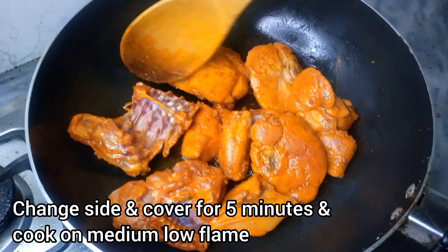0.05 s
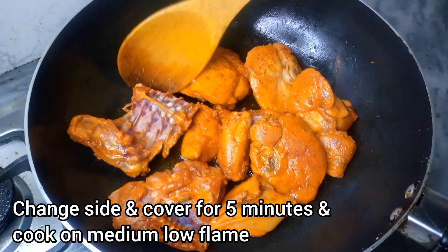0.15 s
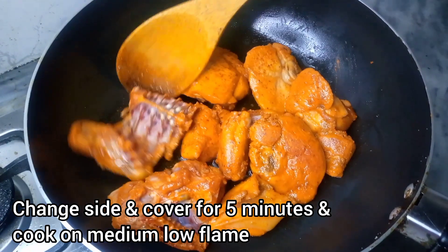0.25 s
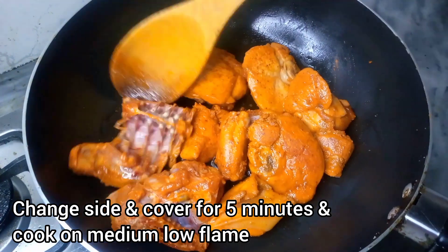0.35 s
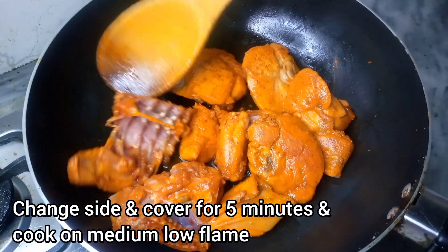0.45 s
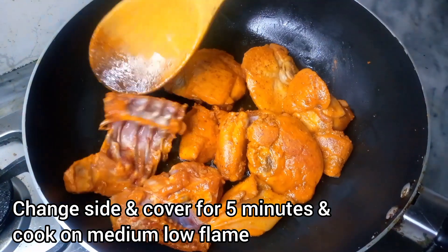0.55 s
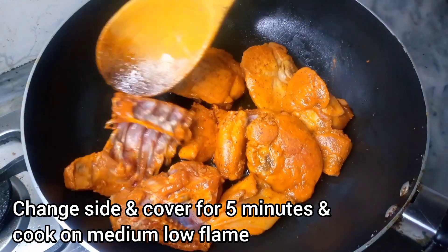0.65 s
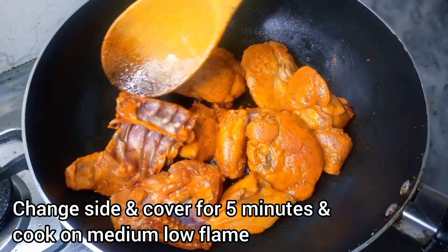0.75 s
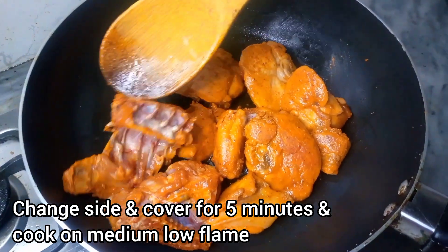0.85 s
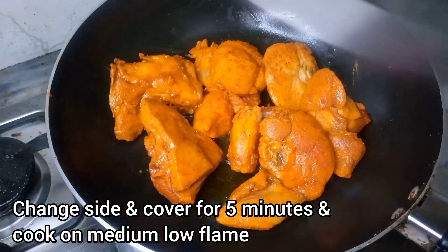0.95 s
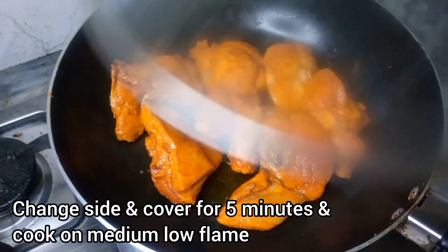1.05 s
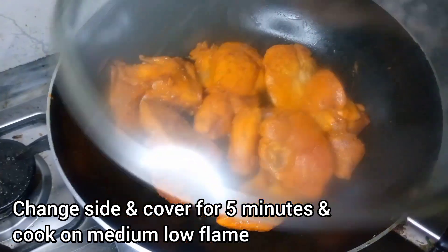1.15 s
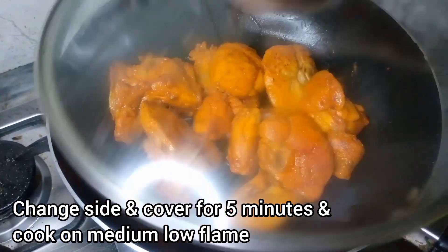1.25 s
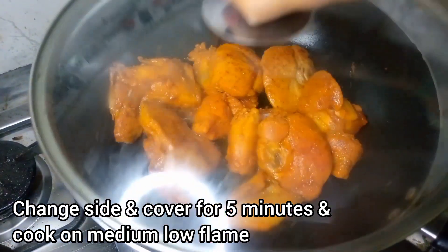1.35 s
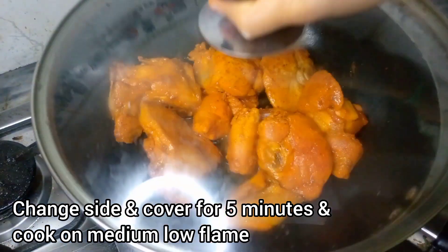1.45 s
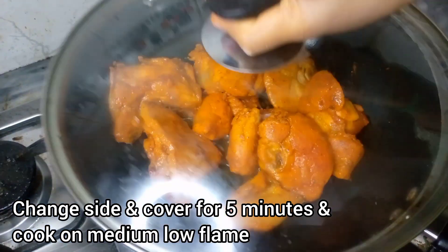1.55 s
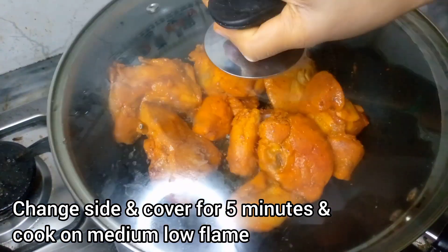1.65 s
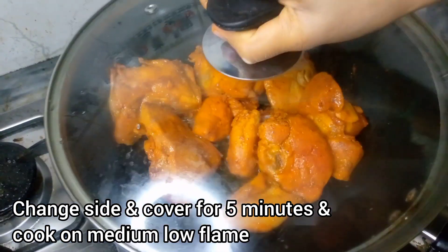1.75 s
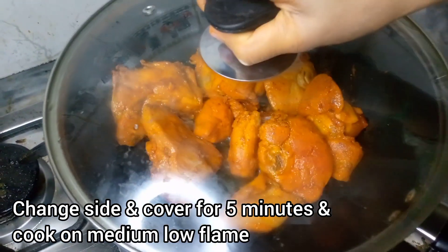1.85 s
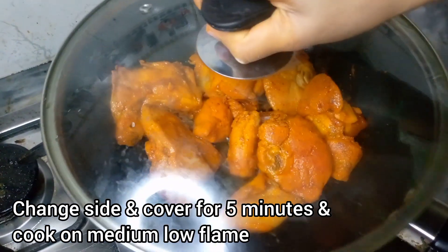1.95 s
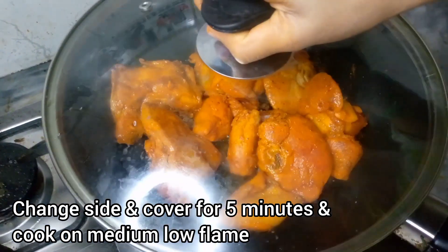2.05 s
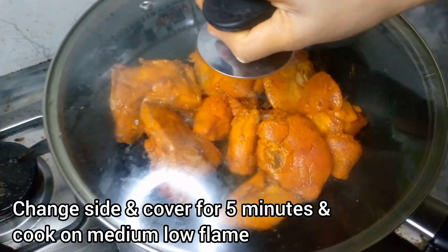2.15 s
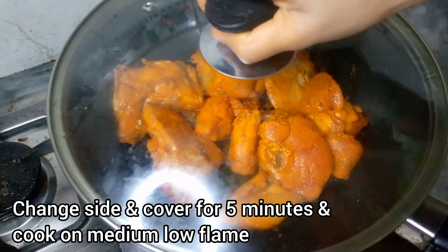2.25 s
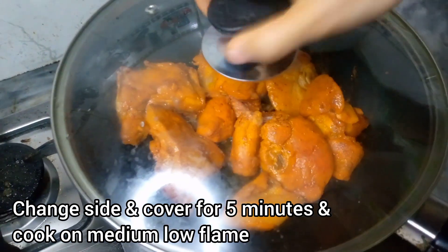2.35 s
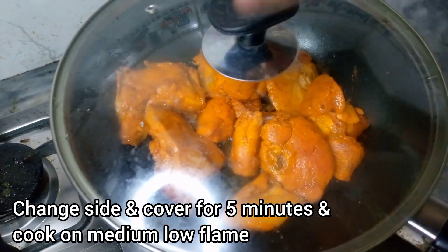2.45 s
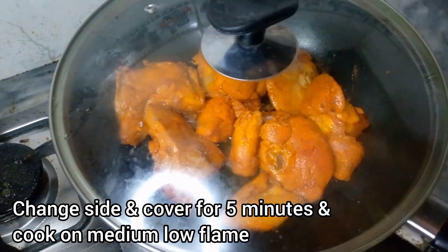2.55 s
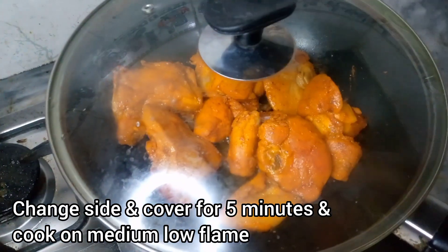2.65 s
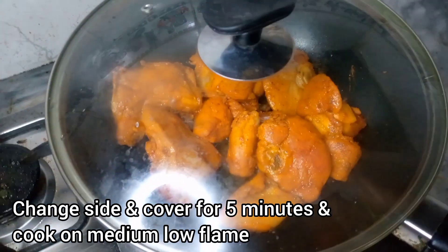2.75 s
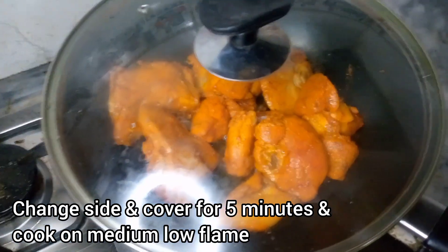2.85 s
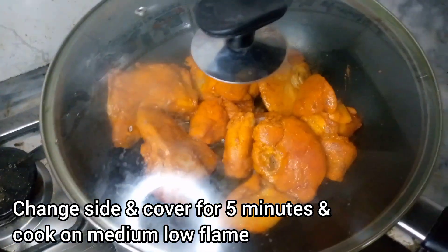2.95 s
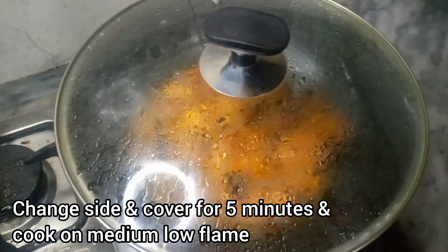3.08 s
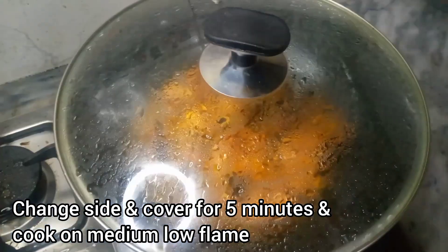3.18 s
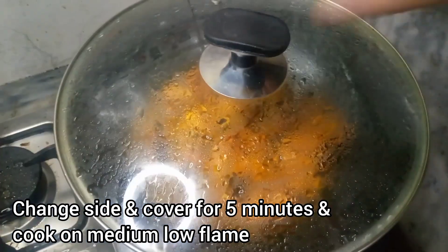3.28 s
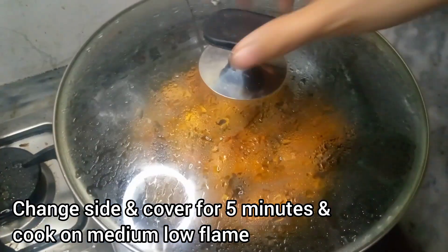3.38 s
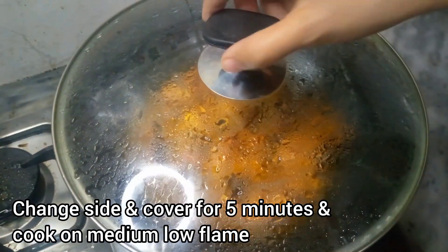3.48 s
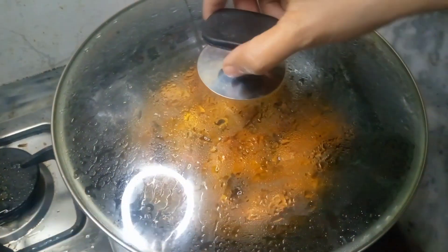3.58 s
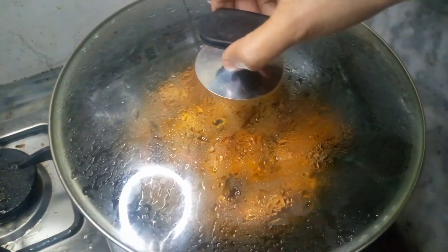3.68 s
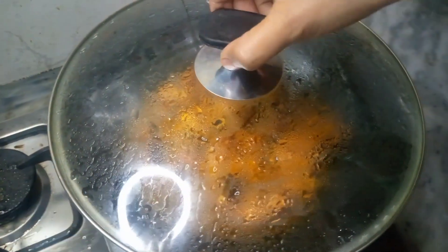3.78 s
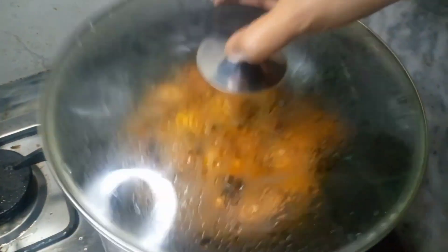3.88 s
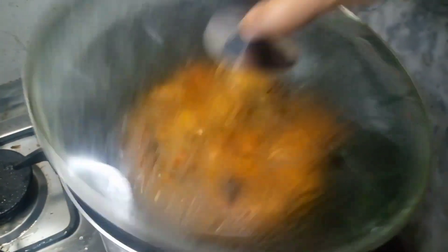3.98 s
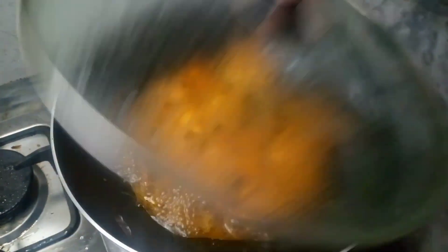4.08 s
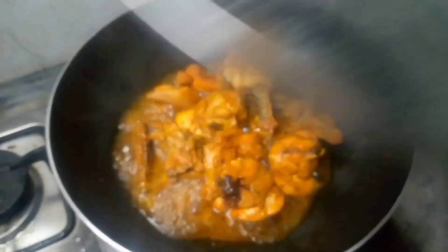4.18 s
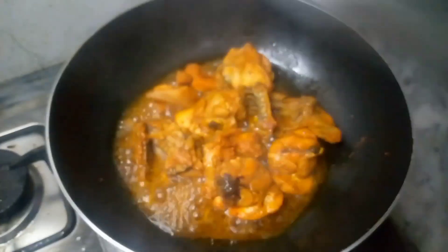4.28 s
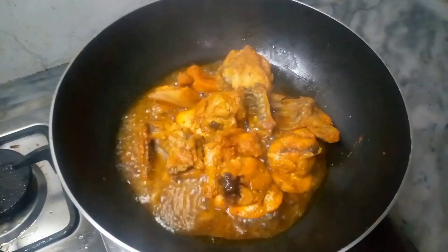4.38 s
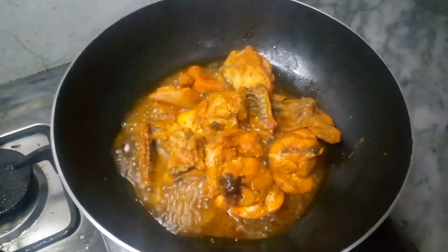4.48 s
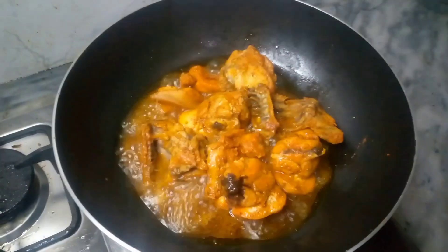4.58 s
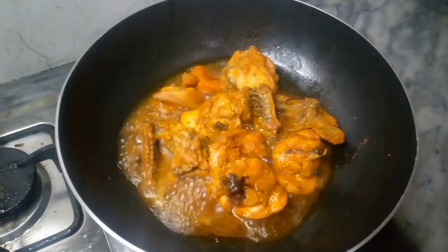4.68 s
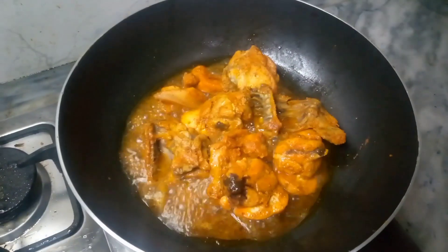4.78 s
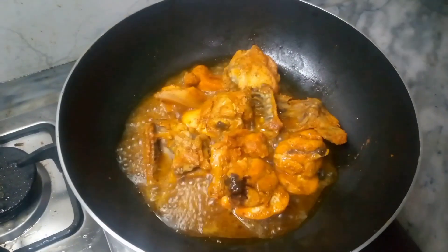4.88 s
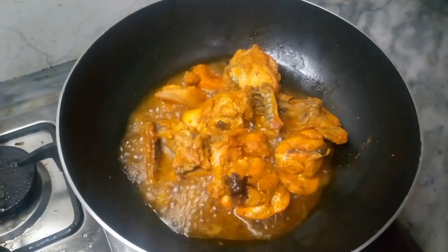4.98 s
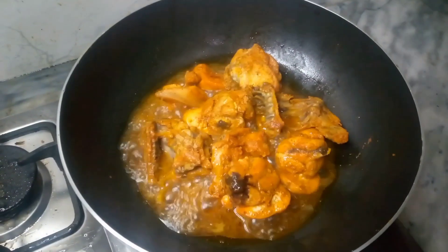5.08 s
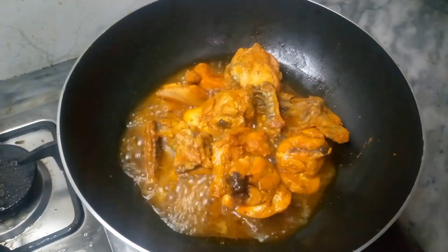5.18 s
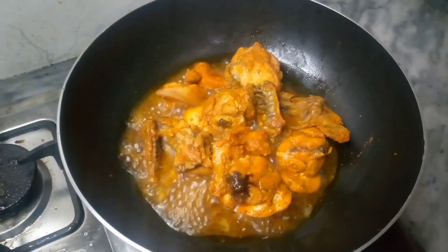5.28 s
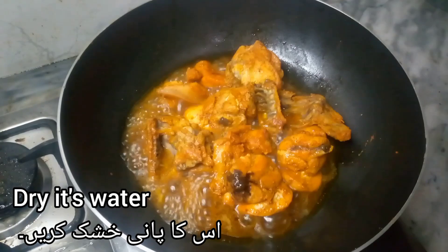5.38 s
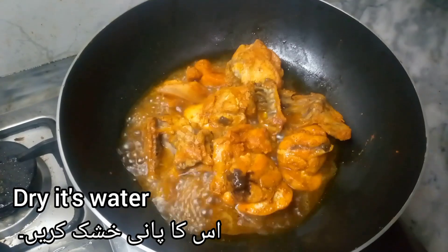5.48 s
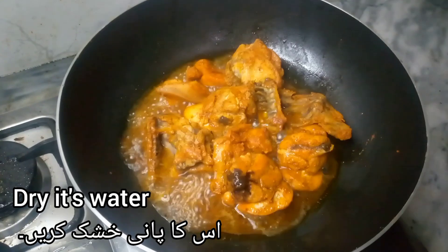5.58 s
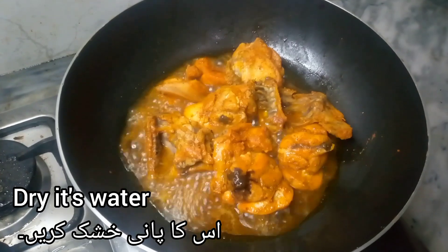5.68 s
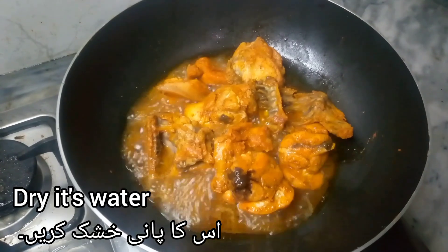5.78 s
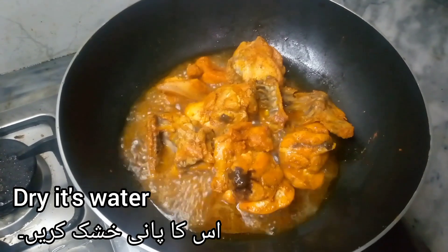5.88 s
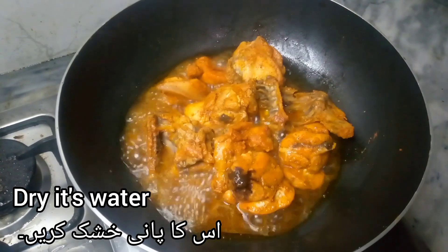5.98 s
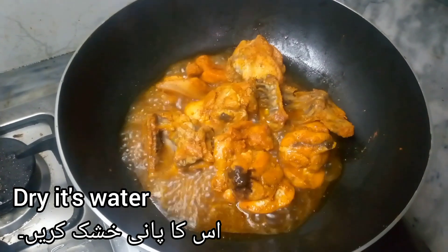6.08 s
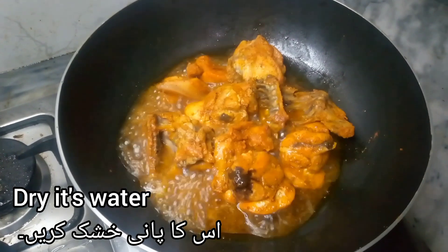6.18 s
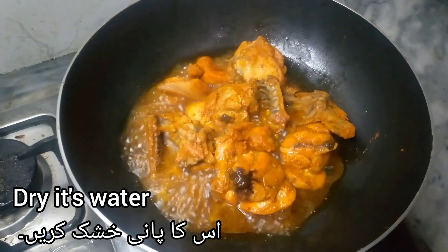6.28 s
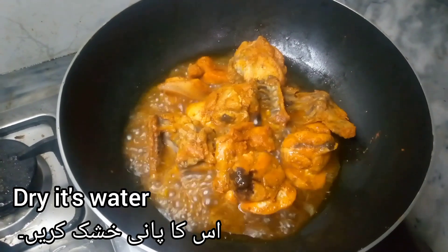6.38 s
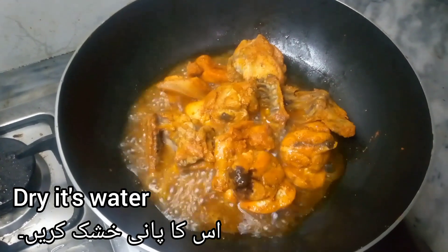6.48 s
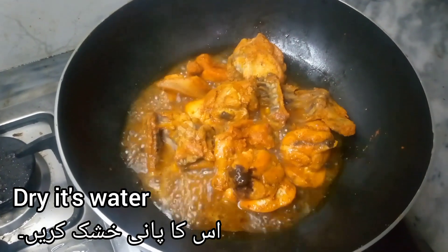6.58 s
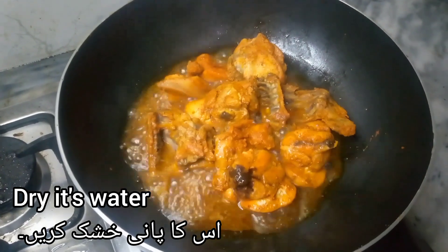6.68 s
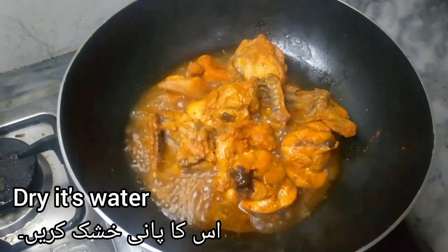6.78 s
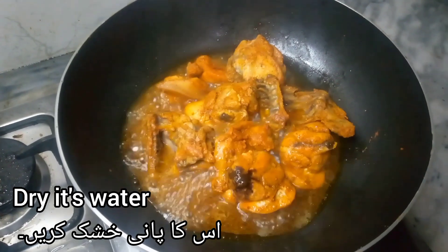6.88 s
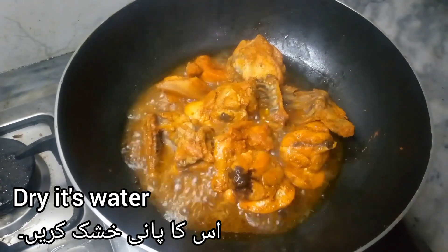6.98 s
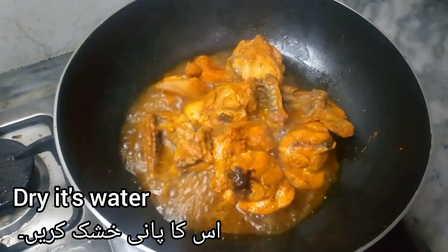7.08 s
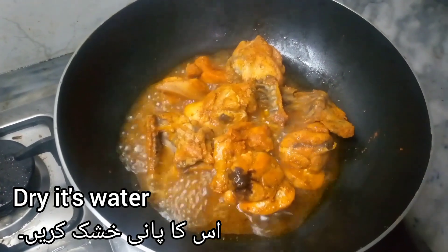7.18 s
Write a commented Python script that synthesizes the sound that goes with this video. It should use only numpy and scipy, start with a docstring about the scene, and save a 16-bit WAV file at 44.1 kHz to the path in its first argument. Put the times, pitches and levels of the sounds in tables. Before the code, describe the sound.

Close up in a small kitchen, meat pieces sizzle brightly in an open wok with spits of fat. A glass lid slides on, knocks the rim and scrapes shut, leaving the frying thinner and quieter. A tiny dry tick, a brief silence, then a faint covered simmer fades in. The lid lifts with a rising hollow whoosh and the sizzle opens up into strong wet bubbling with pops and spits, growing slightly to the end.

```python
"""Chicken fries in an open wok on a gas burner; a glass lid is lowered, knocks on the rim and is nudged shut.
After a short silence the meat simmers in its own juice under the lid, which is then lifted off the bubbling pan.
The sizzle is thousands of tiny random bursts a second, filtered by the air resonances of the wok and lid.
Bubbles, spits of fat and lid knocks are ringing tones with bursts of noise; a small kitchen answers them.
The flame and the rumble are slowly wavering low noise."""
import sys
import numpy as np
from scipy import signal
from scipy.fft import rfft, irfft, next_fast_len
from scipy.io import wavfile
from scipy.ndimage import map_coordinates

SR = 44100
rng = np.random.default_rng(int(sys.argv[2]) if len(sys.argv) > 2 else 0)


def wrap_up_sound(samples):
    """Save the sound to the file named by the first command line argument, as 16-bit audio."""
    columns = np.atleast_2d(samples).T
    # keep every value between -1 and 1, then stretch to whole-number steps
    tamed = np.clip(columns, -1, 1)
    steps = np.round(tamed * 32767).astype(np.int16)
    wavfile.write(sys.argv[1], SR, steps)


N = 318843  # length in samples

# Sizzle colour for each state of pan and lid. Each row: frequency in Hz, gain in dB.
FRY_OPEN = [(200, -24.5), (400, -30), (650, -38), (1250, -30), (2400, -8.5), (3850, 0), (5000, -1),
            (6400, 1), (9300, -7), (12000, -11.5), (15000, -18)]
FRY_AJAR = [(200, -15), (400, -25), (650, -25), (1250, -29), (2400, -3.5), (3850, -4), (5000, -1.5),
            (6400, -3.5), (9300, -12), (12000, -17.5), (15000, -22.5)]
FRY_SHUT = [(200, -13), (400, -10), (650, -16), (1250, -22.5), (2400, -8), (3850, -4.5), (5000, 3),
            (6400, 2), (9300, -4.5), (12000, -18), (15000, -39)]
STEW_SHUT = [(90, -38), (200, -1.5), (400, -12), (1300, -11), (2400, -2.5), (3850, -7), (5000, -3.5),
             (6200, 1), (9300, -8.5), (12000, -9.5), (15000, -19.5)]
STEW_OPEN = [(90, -38), (200, -23.5), (400, -35.5), (1300, -11.5), (2400, -2), (3850, -6), (5000, -4),
             (6200, -3), (9300, -11), (12000, -10), (15000, -19)]
# Air resonances of the pan in the same states. Each row: pitch in Hz, width in Hz, boost in dB.
FRY_OPEN_AIR = [(590, 69, 16), (781, 213, 23.5), (1243, 270, 18.5), (1695, 150, 9), (1960, 83, 8),
                (2465, 160, 2.5), (2740, 160, 0.5)]
FRY_AJAR_AIR = [(524, 76, 6), (807, 49, 10), (1043, 55, 7.4), (1484, 160, 13), (1797, 510, 7.6),
                (2380, 140, 5.3)]
FRY_SHUT_AIR = [(589, 66, 5.8), (826, 91, 16), (1280, 130, 10), (1474, 120, 15), (1720, 140, 14),
                (1934, 120, 17.6), (2434, 140, 8.5), (2935, 340, 6.1), (3520, 380, 8.3), (4380, 140, 4.9)]
STEW_SHUT_AIR = [(554, 86, 3.5), (815, 104, 17), (1008, 150, 14.5), (1320, 120, -7), (1525, 220, 3),
                 (1685, 54, 14.5), (1780, 110, 2), (3500, 200, 2), (3850, 320, -13), (4300, 200, 1.5),
                 (4720, 200, -5.5), (5820, 570, 3.5)]
STEW_OPEN_AIR = [(441.8, 16, 12.4), (485, 280, 22.9), (783, 320, 20.1), (968, 57, 7.8), (1278, 383, 14.7),
                 (1750, 210, 6.9), (2305, 64, 3.6)]
# The pan passes from each state to the next. Each row: middle of the passage in seconds, length in seconds.
CHANGES = [(1.133, 0.35), (1.84, 0.66), (3.08, .05), (4.106, 0.42)]
# Sizzle strength, one row for each state in the order above: bubbling in dB, fizz in dB.
STRENGTH = [(-53, -46.5), (-53, -51.5), (-62.5, -56), (-61, -57), (-47.5, -46.5)]
# The sizzle swells for a moment.
# Each row: start in seconds, length in seconds, most added bubbling in dB, most added fizz in dB.
SURGES = [(0.026, 0.51, 3.5, 3.5), (0.876, 0.17, 3.5, 3), (1.24, 0.35, 2.5, 4.5), (3.44, 0.22, 2, 3),
          (3.643, 0.23, 4.5, 1.5)]

# Colours of single sources. Each row: frequency in Hz, gain in dB.
FLAME_COLOUR = [(20, -26), (45, -11), (65, -1), (88, 4.5), (120, -3), (180, -19.5), (350, -31), (700, -53)]
RUB_COLOUR = [(50, -24), (100, -1.5), (170, -4), (310, -2), (400, -16.5), (520, -15.5), (700, -55),
              (1500, -63.5)]
CLANK_COLOUR = [(200, -33), (500, -6.5), (800, 4), (1000, 5), (1250, -3.5), (1600, -16), (3000, -42.5)]
CLACK_COLOUR = [(100, -21.5), (300, -15), (1000, 0), (1300, 5.5), (2500, 11), (5500, 12), (9500, -2),
                (15000, -19)]
CRACKLE_COLOUR = [(1000, -36.5), (2500, -2.5), (4300, 1), (6500, 3.5), (9500, -10), (15000, -19.5)]
SPLAT_COLOUR = [(300, -9), (800, -1.5), (1900, 0), (3000, -2), (4000, -1), (5500, -12), (9000, -27)]
# Microphone colour. Each row: frequency in Hz, gain in dB.
MIC_COLOUR = [(20, -24), (45, -4.5), (62, -1.5), (6400, -1.5), (7800, -6), (9300, 1), (11000, -5),
              (13600, -11.5), (14800, 7)]

# Lid knocks on the rim, and last a faint double crackle under the lid.
# Each row: time in seconds, then relative dB of low thud, middle clank and high clack.
KNOCKS = [(1.678, -28, -33, -27), (1.699, -20, -25.5, -28), (1.704, -23, -34, -27.5),
          (1.846, -42, -57, -38), (1.925, -52, -58, -45), (2.089, -27.5, -36.5, -42.5),
          (2.097, -29.5, -36, -43.5), (2.12, -32, -44, -64), (2.132, -32.5, -46, -64),
          (2.158, -38.5, -52, -66), (2.441, -56, -57, -39.5), (2.446, -60, -52, -47)]
# Pitches in Hz at which thud, clank and clack each set the strength of the ring.
BLOW_HZ = (330, 940, 2600)
# Lid and wok ring together. Each row: pitch in Hz, relative dB, seconds to fall by 60 dB.
LID_MODES = [(85.8, -10, 0.24), (135, -15, 0.22), (240, -14, .045), (325.6, -9, 0.14), (470.5, -12.5, 0.19),
             (545, -17.5, 0.29), (800, -23, 0.1), (941.5, -9.5, 0.28), (1487, -17.5, 0.25),
             (1910, -27, 0.16), (2587, -9, 0.084), (2967, -4.5, 0.076), (3580, -15.5, 0.14)]
# The lid judders as it is pushed along the rim. Each row: start in seconds, level in dB, length in seconds.
JUDDERS = [(1.2, -75, 0.1), (1.828, -44.5, 0.021), (1.935, -56.5, 0.058), (1.975, -49, 0.035),
           (2.052, -44, 0.044), (2.212, -57, 0.035)]
# The lid slides on the rim. Each row: start in seconds, length in seconds, level in dB.
SLIDES = [(1.11, 0.13, -55), (1.79, 0.25, -55), (2.062, 0.075, -44)]
# A deep rumble while the lid is handled. Each row: start in seconds, length in seconds, level in dB.
RUMBLES = [(.97, 0.33, -56.5), (1.69, 0.11, -53), (1.85, 0.42, -62), (2.42, 0.21, -56),
           (2.89, 0.028, -53.5), (3.33, 0.12, -59.5)]
# One dry tick: time in seconds, peak in dB, centre in Hz.
TICK = (2.863, -18.5, 940)

# Fat spits. Each row: time in seconds, level in dB, centre in Hz.
SPITS = [(0.0992, -32, 6000), (0.105, -36, 4000), (0.193, -34, 3860), (0.199, -35, 3970),
         (0.207, -37, 4900), (0.215, -36, 5200), (0.303, -29, 5000), (0.357, -30, 5260), (0.37, -33, 4800),
         (0.382, -33, 9800), (.538, -32, 4300), (0.5457, -32, 5830), (0.6803, -35, 4130),
         (0.689, -34, 4540), (0.7892, -30.5, 9200), (0.9208, -30, 4270), (.945, -32, 2130),
         (0.975, -32, 13800), (0.976, -37, 4600), (1.007, -32, 4140), (1.114, -35, 4340),
         (1.115, -44, 2340), (1.5022, -28.5, 6250), (1.6102, -36, 6160), (2.07, -43.5, 10830),
         (4.532, -29.5, 5300), (5.334, -31.5, 4530), (5.4237, -33, 5650), (5.556, -35.5, 11500),
         (5.701, -30.5, 4560), (5.738, -32, 4900), (5.751, -35, 5600), (5.791, -33, 5400),
         (6.0713, -26.5, 5600), (6.155, -29.5, 10330), (6.761, -30.5, 6160)]
# Large bubbles of juice burst. Each row: time in seconds, peak in dB, final pitch in Hz,
# seconds for the ring to fall by 60 dB, share by which the pitch starts higher.
PLOPS = [(4.057, -42, 436, 0.12, .05), (4.531, -38.5, 810, 0.04, .05), (4.629, -36, 1320, .04, 0.055),
         (4.901, -36, 1280, 0.047, .05), (5.237, -34.5, 900, 0.035, .1), (5.24, -35.5, 1290, 0.024, .05),
         (5.331, -35.5, 1187, 0.042, 0.088), (5.475, -37, 1684, 0.096, 0.054),
         (5.668, -34.5, 1260, 0.021, .05), (5.697, -35, 2350, 0.027, 0.056),
         (5.728, -35.5, 1290, .04, 0.038), (5.834, -40.5, 1220, .03, .05), (5.93, -34.5, 2250, 0.032, .05),
         (5.999, -36.5, 1273, 0.11, 0.033), (6.108, -37, 2310, 0.057, 0.027), (6.118, -38, 2130, 0.07, .03),
         (6.235, -37.5, 2800, 0.083, 0.067), (6.262, -33, 1230, 0.024, 0.085),
         (6.321, -37.5, 1580, .04, 0.046), (6.568, -38, 1350, .04, .05), (6.678, -38, 1210, 0.043, .05),
         (6.874, -40, 1230, .03, .05), (6.9179, -28.5, 1260, 0.035, .08), (6.9194, -31, 1720, 0.025, .1),
         (6.985, -34.5, 1000, .018, .1), (7.008, -41.5, 344, .08, .03), (7.018, -33, 1590, 0.057, .03),
         (7.078, -26, 2090, 0.0078, .1), (7.078, -29.5, 1530, 0.14, .36), (7.16, -36.5, 1200, 0.035, .05),
         (7.22, -32.5, 1075, 0.04, .1)]
# A bursting bubble throws a wet splat. Each row: time in seconds, peak in dB, seconds to fall by 60 dB.
SPLATS = [(7.0769, -27, 0.064), (7.084, -33, .06)]
# Steam squeezes out in thin whistles. Each row: start in seconds, level in dB, pitch in Hz, length in seconds.
WHISTLES = [(2.933, -47.5, 14300, 0.032), (3.594, -44, 12600, 0.028), (6.072, -50, 8930, 0.046),
            (6.078, -51, 10200, 0.052), (6.073, -52.5, 14250, 0.055), (6.353, -45.5, 10020, .035)]
# Bouts of stronger gurgling. Each row: start in seconds, length in seconds, level in dB.
GURGLES = [(3.335, 0.11, -55.5), (4.09, 0.11, -66), (4.53, 0.38, -64), (4.93, 0.54, -59.5),
           (7.0, 0.023, -57)]
# Short soft puffs and swells of sizzle, some as the lid lifts.
# Each row: start in seconds, length in seconds, level in dB, centre in Hz, width in Hz.
SOFT_SWELLS = [(2.606, 0.027, -51, 4800, 1500), (3.324, 0.24, -68, 574, 220),
               (3.474, 0.11, -59.5, 1900, 880), (3.674, 0.13, -70, 2100, 1400),
               (3.94, 0.2, -57.5, 1660, 1600), (4.016, 0.062, -53, 3950, 2800),
               (5.9, 0.076, -51.5, 540, 300)]
# A freshly turned piece sears; its bright hiss sinks as the wet skin dries.
# Each row: time in seconds, centre in Hz, level in dB.
SEAR = [(0, 5000, -52.5), (.22, 4920, -50.5), (.45, 4630, -51.5), (.62, 4440, -57), (.85, 4300, -52),
        (1.01, 4200, -51), (1.13, 4340, -54.5), (1.25, 4300, -66), (1.5, 4300, -100)]
# The air under the lid booms higher as the gap opens. Each row: time in seconds, pitch in Hz, level in dB.
LIFT = [(3.45, 289, -100), (3.57, 305, -63.5), (3.8, 298, -70), (3.92, 335, -66), (3.99, 425, -66),
        (4.06, 463, -53.5), (4.13, 470, -71), (4.22, 465, -60), (4.4, 500, -100)]
# Frequency bands in which bubbles come and go separately. Each row: lower edge in Hz, upper edge in Hz.
BUBBLE_BANDS = [(0, 1080), (1080, 1600), (1600, 2250), (2250, 3200)]
# The sound drops out and fades back in. Each row: start in seconds, end in seconds, fade-in in seconds.
DROPOUTS = [(0.874, 0.907, 0.0027), (2.978, 3.161, 0.16)]

MUTE_DB, FADE_FROM_DB = -59, -38  # depth of a dropout; where each fade-in starts
TOP_HZ, SPLIT_HZ = 15700, 3000  # top of all sound; border between bubbling and fizz
FLAME_DB = -66  # the burner runs steadily
BOIL_S, BOIL_DB_PER_S = 4.2, 0.44  # from this time on the boil grows steadily
GURGLE_START_S, GURGLE_DB = 2.9, -68.5  # juice gurgles deep under the meat
SPUTTER_DB, SPUTTERS_PER_S = 0.44, 12  # the whole sizzle sputters unevenly
WAVER_DB, WAVERS_PER_S = 1.5, 18  # bubbles in each band come and go in clusters of their own
CRACKLE_DB, CRACKLES_PER_S = -10, 100  # dry crackle of fat, level against the fizz
STEW_CRACKLE_SHARE = .6  # power share: the wet stew crackles less
SEAR_WIDTH_HZ, LIFT_WIDTH_HZ = 390, 55
# second air resonance under the lid: base pitch, share of the first pitch added, level against the first
UPPER_HZ, UPPER_FOLLOWS, UPPER_DB = 670, 1.1, 0
# the wok's main air resonance while frying: pitch, drift, level, unevenness
BOWL_HZ, BOWL_DRIFT_HZ, BOWL_DB, BOWL_WAVER_DB = 814, 30.1, -69, 8
SPLASH_DB, SPLASH_DB_PER_S = 5.5, -110  # splash over ring; the longer a bubble rings, the less it splashes
GLIDE_S = 0.0066  # the pitch of a burst bubble settles this quickly


def amp(db):
    """Turn dB into a plain gain."""
    return 10 ** (np.asarray(db) / 20)


def unit(x):
    """Scale a sound to rms 1."""
    return x / np.sqrt(np.mean(x ** 2) + 1e-20)


def along(points, hz):
    """Read a curve of (Hz, value) points on a log frequency axis."""
    f, v = np.transpose(points)
    return np.interp(np.log(hz + 1), np.log(f + 1), v)


def peak_db(f, hz, steepness):
    """Filter gain in dB that is 0 around one pitch and falls away on both sides."""
    return -10 * np.log10(1 + (steepness * np.log2((f + 1) / hz)) ** 4)


def curves(rows):
    """One value per sample for each column after the time."""
    s, *columns = np.transpose(rows)
    return [np.interp(np.arange(N) / SR, s, column) for column in columns]


def wobble(rate):
    """A smooth random curve with this many random points a second."""
    return map_coordinates(rng.standard_normal(int(N * rate / SR) + 4), [np.arange(N) * rate / SR])


def coloured(x, db_of_hz, size=4096):
    """Filter x with the given gain in dB, with no sound ahead of its cause."""
    gain = np.maximum(amp(db_of_hz(np.fft.rfftfreq(size, 1 / SR))), 1e-6)
    # folding the cepstrum forward in time gives the minimum-phase filter
    cepstrum = irfft(np.log(gain))
    cepstrum[1:size // 2] *= 2
    cepstrum[size // 2 + 1:] = 0
    return signal.fftconvolve(x, irfft(np.exp(rfft(cepstrum))))[:len(x)]


def band(x, lo_hz, hi_hz):
    """Keep only what lies between two frequencies."""
    m = next_fast_len(N + 8192)
    hz = np.fft.rfftfreq(m, 1 / SR)
    return irfft(rfft(x, m) * ((hz >= lo_hz) & (hz < hi_hz)), m)[:N]


def resonance(x, hz, width_hz):
    """Pass x through a steep resonance whose pitch may move, at rms 1."""
    # turn the pitch down to 0 Hz, smooth, and turn it back up
    turn = np.exp(2j * np.pi * np.cumsum(hz * np.ones(N)) / SR)
    smooth = signal.lfilter(*signal.butter(2, width_hz / SR), x / turn)
    return unit((smooth * turn).real)


def add(track, s, sound):
    """Mix a sound into a track at time s."""
    part = track[max(round(s * SR), 0):][:len(sound)]
    part += sound[:len(part)]


def bursts(rate, spread_db):
    """Random impulses at a mean rate a second, of uneven size, scaled to rms 1."""
    happens = rng.random(N) < rate / SR
    size_db = spread_db * np.minimum(rng.standard_normal(N), 3.3)
    return unit(happens * amp(size_db) * rng.choice([-1, 1], N))


def bouts(rows, attack_s, t60):
    """Gain of (start, length, dB) events that rise, hold and die away."""
    t = np.arange(N) / SR
    total = 0
    for s, length, db in rows:
        rise = np.clip((t - s) / attack_s, 0, 1)
        total = total + rise * amp(db - 60 * np.maximum(t - s - length, 0) / t60)
    return total


def puff(colour, t60):
    """A dying burst of coloured noise of peak 1, half a second long."""
    t = np.arange(SR // 2) / SR
    sound = coloured(rng.standard_normal(len(t)) * amp(-60 * t / t60), lambda f: along(colour, f))
    return sound / np.abs(sound).max()


def room(x, wet_db, t60, size=2048, count=11025):
    """Direct sound plus the quick answer of wok and walls: dying noise, new for each short stretch of x."""
    t, out = np.arange(count) / SR, x.copy()
    decay = amp(-60 * t / t60) * (t > .001)
    for start in range(0, N, size):
        tail = rng.standard_normal(count) * decay
        tail /= np.linalg.norm(tail)
        add(out, start / SR, amp(wet_db) * signal.fftconvolve(x[start:start + size], tail))
    return out


def state_shares():
    """How much of each state of pan and lid holds at each moment."""
    t = np.arange(N) / SR
    reached = [np.clip((t - s) / length + .5, 0, 1) for s, length in CHANGES]
    return np.abs(np.diff([np.ones(N)] + reached + [np.zeros(N)], axis=0))


def strength():
    """Bubbling and fizz in dB: set by the state, raised by surges and by the growing boil."""
    t = np.arange(N) / SR
    level_db = np.transpose(STRENGTH) @ state_shares() + BOIL_DB_PER_S * np.maximum(t - BOIL_S, 0)
    for s, length, *gain_db in SURGES:
        level_db += np.outer(gain_db, np.sin(np.pi * np.clip((t - s) / length, 0, 1)))
    return level_db


def flame():
    """The gas burner's low, uneven flutter is filtered noise of wavering level."""
    noise = unit(coloured(rng.standard_normal(N), lambda f: along(FLAME_COLOUR, f)))
    return noise * amp(FLAME_DB + 2.5 * wobble(4.9))


def rumble():
    """A deep, lumpy rumble comes and goes as the lid is handled."""
    colour = [(20, -28.0), (45, -30.5), (65, -10.0), (88, 0.5), (120, -4.5), (180, -17.5), (350, -50.0)]
    noise = unit(coloured(rng.standard_normal(N), lambda f: along(colour, f)))
    return noise * bouts(RUMBLES, attack_s=0.017, t60=0.56) * amp(0.88 * wobble(13))


def tick():
    """A single short, dead click is one impulse through a broad filter."""
    s, db, hz = TICK
    blow = np.zeros(N)
    blow[round(s * SR)] = 1
    click = coloured(blow, lambda f: peak_db(f, hz, 0.67) - 9 * (f / 6500) ** 2)
    return amp(db) * click / np.abs(click).max()


def judders():
    """Stick and slip keep the lid's main mode going for a moment."""
    out = np.zeros(N)
    for s, db, length in JUDDERS:
        n = int(length * SR)
        phase = np.cumsum(2 * np.pi * 325 / SR + 0.025 * rng.standard_normal(n))
        swell = np.sin(np.pi * np.arange(n) / n)
        add(out, s, amp(db) * np.sqrt(2) * np.sin(phase) * swell)
    return out


def lid_ring(blow):
    """The lid and wok ring in many modes, each as strong as the blow is near its pitch."""
    t = np.arange(SR // 2) / SR
    ring = np.zeros(len(t))
    for hz, db, t60 in LID_MODES:
        # the lid chatters on the rim, so its modes drift in phase
        drift = .016 * np.sqrt(hz / 1000) * np.cumsum(rng.standard_normal(len(t)))
        level_db = along(blow, hz) + db + rng.normal(0, 2.7) - 60 * t / t60
        ring += amp(level_db) * np.sin(2 * np.pi * hz * t + drift + rng.uniform(0, 2 * np.pi))
    return ring * (1 - np.exp(-t / 0.001))


def lid():
    """Each knock thuds in the wok, clanks in the glass and clacks at the steel rim; sliding rumbles low."""
    thud_colour = [(40, -23.5), (110, -7.5), (330, 13.0), (950, -21.0), (1500, -15.5), (4000, -58)]
    out = np.zeros(N)
    # the faint double crackle is made in the same way as the knocks
    for s, thud_db, clank_db, clack_db in KNOCKS:
        ring = lid_ring(list(zip(BLOW_HZ, (thud_db, clank_db, clack_db))))
        thud = amp(thud_db) * puff(thud_colour, t60=0.039)
        clank = amp(clank_db) * puff(CLANK_COLOUR, t60=0.049)
        clack = puff(CLACK_COLOUR, t60=.012) + amp(3.5) * puff(CLACK_COLOUR, t60=0.08)
        add(out, s, amp(-5.5) * ring + amp(-3.5) * (thud + clank + amp(clack_db) * clack))
    rub = unit(coloured(bursts(rate=440, spread_db=8.0), lambda f: along(RUB_COLOUR, f)))
    return out + bouts(SLIDES, attack_s=0.014, t60=0.35) * rub


def lift():
    """Bubbles excite two air resonances under the lid; both sweep up as it comes off."""
    hz, db = curves(LIFT)
    bubbles = bursts(rate=2500, spread_db=0.5)
    lower = resonance(bubbles, hz, LIFT_WIDTH_HZ)
    upper = resonance(bubbles, UPPER_HZ + UPPER_FOLLOWS * hz, width_hz=88)
    return amp(db) * (lower + amp(UPPER_DB) * upper)


def whistles():
    """Escaping steam sounds as narrow tones whose phase wavers at random."""
    out = np.zeros(N)
    for s, db, hz, length in WHISTLES:
        n = int(length * SR)
        phase = np.cumsum(2 * np.pi * hz / SR + 0.11 * rng.standard_normal(n))
        swell = np.sin(np.pi * np.sqrt(np.arange(n) / n))
        add(out, s, amp(db) * np.sqrt(2) * np.sin(phase) * swell)
    return out


def hollow(hz, width_hz):
    """Air rings at a pitch under random kicks, at rms 1."""
    phase = 2 * np.pi * np.cumsum(hz * np.ones(N)) / SR
    return unit(wobble(width_hz) * np.sin(phase) + wobble(width_hz) * np.cos(phase))


def gurgle():
    """The low voice of the boil is air ringing at a low pitch under random kicks."""
    t = np.arange(N) / SR
    steady = amp(GURGLE_DB) * (t > GURGLE_START_S)
    boil = np.hypot(steady, bouts(GURGLES, attack_s=0.015, t60=0.11)) * amp(1.9 * wobble(5.77))
    return boil * hollow(hz=293, width_hz=115)


def soft_swells():
    """Short soft puffs and swells of sizzle are dense bursts through a resonance."""
    out = np.zeros(N)
    for s, length, db, hz, width_hz in SOFT_SWELLS:
        swell = bouts([(s, length, db)], attack_s=0.022, t60=0.17)
        out += swell * resonance(bursts(rate=2600, spread_db=-2.5), hz, width_hz)
    return out


def plop(hz, t60, glide, splash_db, splash_t60):
    """One bubble of peak 1: a ring whose pitch slides, with a wet splash of noise."""
    t = np.arange(SR // 10) / SR
    pitch = hz * (1 + glide * np.exp(-t / GLIDE_S))
    ring = np.sin(2 * np.pi * np.cumsum(pitch) / SR) * amp(-60 * t / t60)
    noise = rng.standard_normal(len(t)) * amp(-60 * t / splash_t60)
    splash = coloured(noise, lambda f: peak_db(f, hz, 1.64))
    sound = ring + amp(splash_db) * splash / np.abs(splash).max()
    return sound / np.abs(sound).max()


def juice():
    """The juice boils: a few large bubbles and splats among many small bubbles."""
    large, small = np.zeros(N), np.zeros(N)
    for s, db, hz, t60, glide in PLOPS:
        splash_db = SPLASH_DB + SPLASH_DB_PER_S * t60
        add(large, s, amp(db) * plop(hz, t60, glide, splash_db, splash_t60=0.028))
    for s, db, t60 in SPLATS:
        add(large, s, amp(db) * puff(SPLAT_COLOUR, t60))
    for when, pitch, size, slide in rng.random(size=(170, 4)):
        hz = 750 * 4.4 ** pitch
        blip = plop(hz, t60=22 / hz, glide=.2 * (slide - .5), splash_db=-3, splash_t60=.008)
        # the power below 1 makes them denser towards the end
        add(small, BOIL_S + (N / SR - BOIL_S) * when ** .8, amp(-44 + 5 * size ** 4) * blip)
    return large + small


def snap(hz, spray_db):
    """One exploding droplet: a few rough cycles of ring of peak 1, plus a brief spray."""
    t = np.arange(SR // 12) / SR
    rough_hz = hz * (1 + 0.37 * rng.standard_normal(len(t)))
    ring = np.sin(2 * np.pi * np.cumsum(rough_hz) / SR) * t * amp(-60 * t / 0.003)
    noise = rng.standard_normal(len(t)) * amp(-60 * t / 0.053)
    spray = coloured(noise, lambda f: peak_db(f, hz, 5.0))
    return ring / np.abs(ring).max() + amp(spray_db) * spray / np.abs(spray).max()


def spits():
    """A few loud spits of fat over many faint, dry ones, which follow the strength of the fizz."""
    loud, faint = np.zeros(N), np.zeros(N)
    for s, db, hz in SPITS:
        add(loud, s, amp(db) * snap(hz, spray_db=-9.5))
    for when, pitch, size in rng.random(size=(200, 3)):
        droplet = snap(4400 * 2.6 ** pitch, spray_db=-29.0)
        add(faint, when * N / SR, amp(5.5 + 5.4 * size ** 4) * droplet)
    _, fizz_db = strength()
    highpass = signal.butter(2, 1100, 'highpass', fs=SR, output='sos')
    return signal.sosfilt(highpass, loud + faint * amp(fizz_db))


def sear():
    """Dense, tiny bursts under the turned piece make one bright, sinking band of hiss."""
    hz, db = curves(SEAR)
    return amp(db) * resonance(bursts(rate=4500, spread_db=-1.0), hz, SEAR_WIDTH_HZ)


def bowl():
    """Clusters of bursts set the air in the wok humming by fits and starts, its pitch drifting."""
    pitch = BOWL_HZ + BOWL_DRIFT_HZ * wobble(8.3)
    hum = resonance(bursts(rate=550, spread_db=6), pitch, width_hz=70)
    uneven = unit(hum * amp(BOWL_WAVER_DB * np.tanh(wobble(18))))
    frying = state_shares()[:3].sum(axis=0)
    return amp(BOWL_DB) * uneven * np.sqrt(frying)


def crackle():
    """Sharp single ticks of fat stand out of the fizz; the shut lid hides them."""
    ticks = room(bursts(rate=CRACKLES_PER_S, spread_db=0.5), wet_db=-5.5, t60=.03)
    ticks = unit(coloured(ticks, lambda f: along(CRACKLE_COLOUR, f)))
    _, fizz_db = strength()
    fry_open, fry_ajar, _, _, stew_open = state_shares()
    return ticks * amp(CRACKLE_DB + fizz_db) * np.sqrt(fry_open + fry_ajar + STEW_CRACKLE_SHARE * stew_open)


def pan_colour(spectrum, air):
    """Gain in dB of a burst heard through the pan's air resonances."""
    def gain_db(hz):
        return along(spectrum, hz) + sum(db * .5 ** ((2 * (hz - c) / w) ** 2) for c, w, db in air)
    return gain_db


def sizzle():
    """Bubbles fill the lows and middle, fine bursts of steam the top; the lid reshapes both."""
    bubbling_db, fizz_db = strength()
    pops = bursts(rate=3400, spread_db=3.5) * amp(0.21 * wobble(40))
    pops = room(pops, wet_db=-1.0, t60=0.15, size=512, count=4096)
    bubbles = np.zeros(N)
    for lo, hi in BUBBLE_BANDS:
        bubbles += band(pops, lo, hi) * amp(WAVER_DB * np.tanh(wobble(WAVERS_PER_S)))

    fizz = bursts(rate=5000, spread_db=5.5) * amp(0.084 * wobble(35))
    fizz = room(fizz, wet_db=2.5, t60=0.078, size=512, count=2048)
    # the very finest droplets crackle sparsely in the highest treble
    droplets = room(bursts(rate=67, spread_db=15.0), wet_db=3.5, t60=0.02)
    fizz = unit(fizz) + amp(-22.5) * band(droplets, 6200, TOP_HZ)

    states = [(FRY_OPEN, FRY_OPEN_AIR), (FRY_AJAR, FRY_AJAR_AIR), (FRY_SHUT, FRY_SHUT_AIR),
              (STEW_SHUT, STEW_SHUT_AIR), (STEW_OPEN, STEW_OPEN_AIR)]
    out = np.zeros(N)
    for state, share in zip(states, state_shares()):
        low = unit(band(coloured(bubbles, pan_colour(*state)), 0, SPLIT_HZ))
        high = unit(band(coloured(fizz, pan_colour(*state)), SPLIT_HZ, TOP_HZ))
        out += np.sqrt(share) * (amp(bubbling_db) * low + amp(fizz_db) * high)
    return out * amp(SPUTTER_DB * wobble(SPUTTERS_PER_S))


def scene():
    """Mix all sources; spits, juice and lid each get an answer from wok and walls."""
    background = flame() + rumble() + tick()
    handling = room(lid() + judders(), wet_db=-10, t60=0.28) + lift()
    stew = whistles() + gurgle() + room(juice(), wet_db=-6.5, t60=0.11)
    frying = room(spits(), wet_db=-3.5, t60=0.056) + sear() + bowl() + crackle()
    return (background + handling + stew + frying + soft_swells() + sizzle())[None]


def fader():
    """Gain that cuts out at each dropout, then climbs back evenly in dB."""
    t, gain_db = np.arange(N) / SR, np.zeros(N)
    for start, end, fade_s in DROPOUTS:
        fade_in_db = FADE_FROM_DB * np.clip(1 - (t - end) / fade_s, 0, 1)
        gain_db += (t >= start) * np.where(t < end, MUTE_DB, fade_in_db)
    return amp(gain_db)


def record(dry):
    """Apply the microphone colour, the fader and the band limit."""
    sound = coloured(dry[0], lambda f: along(MIC_COLOUR, f)) * fader()
    return band(sound, 0, TOP_HZ)[None]


dry = scene()
out = record(dry)
wrap_up_sound(out)
```